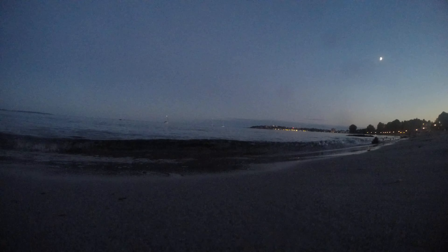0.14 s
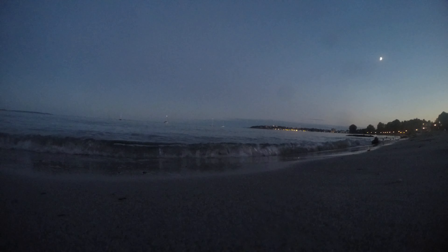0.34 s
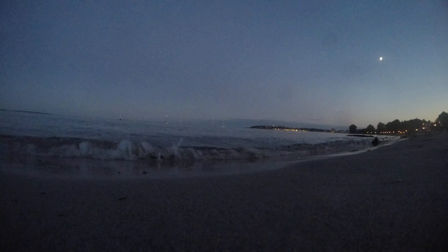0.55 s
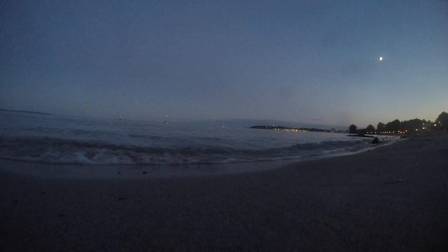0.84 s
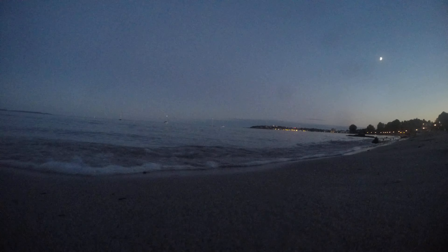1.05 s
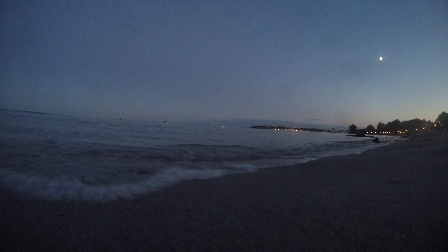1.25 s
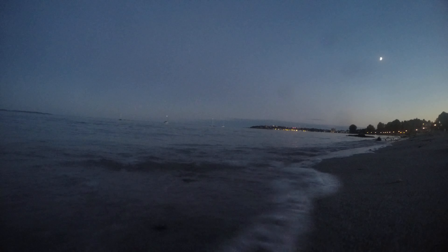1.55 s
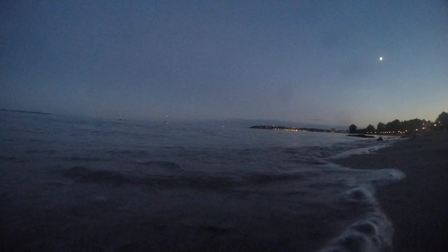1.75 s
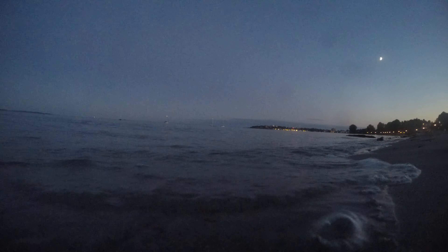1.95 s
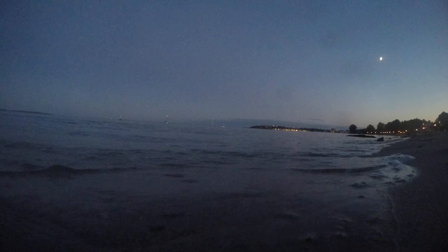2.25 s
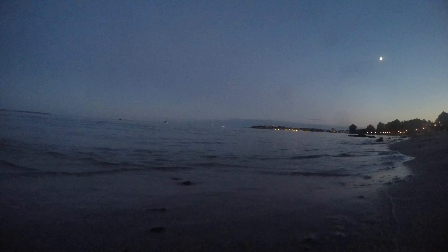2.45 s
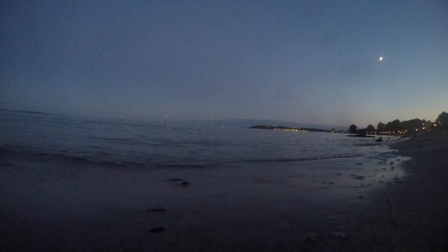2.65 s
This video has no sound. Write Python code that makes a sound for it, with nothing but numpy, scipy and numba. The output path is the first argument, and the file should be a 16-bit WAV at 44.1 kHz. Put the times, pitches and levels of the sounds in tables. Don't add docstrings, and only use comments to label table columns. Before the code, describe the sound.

A small wave breaks on a sandy beach, fizzes up as foam, then drains with bubbling pops

```python
import sys
import numpy as np
from scipy import signal
from scipy.io import wavfile
from scipy.ndimage import uniform_filter1d
from numba import njit

SR = 44100
rng = np.random.default_rng(int(sys.argv[2]) if len(sys.argv) > 2 else 0)


def waveform_to_disk(signal):
    frames = np.transpose(np.atleast_2d(signal))
    scaled = np.clip(frames, -1, 1) * 32767
    samples = np.round(scaled).astype(np.int16)
    wavfile.write(sys.argv[1], SR, samples)


def undo_db(level):
    steps = np.asarray(level, float) / 20
    return 10 ** steps


N = 123921


def set_rms(x, db):
    return x * undo_db(db) / np.sqrt(np.mean(x ** 2))


def spectrum_db(table, hz):
    table = np.array(table)
    return np.interp(np.log(hz), np.log(table[:, 0]), table[:, 1])


def drift(rate_hz):
    k = int(SR / rate_hz)
    steps = np.repeat(rng.standard_normal(N // k + 1), k)
    return 0.8 * uniform_filter1d(uniform_filter1d(steps, k), k)[:N]


def resonance(x, hz, width_hz):
    return signal.lfilter(*signal.iirpeak(hz, hz / width_hz, fs=SR), x)


@njit
def ring(n, start, hz, cycles, size, rise, onset, sr):
    out = np.zeros(n)
    for k in range(len(start)):
        length = cycles[k] * sr / hz[k]
        turn = np.exp(-5. / length + 6.2832j * hz[k] / sr)
        glide = np.exp(6.2832j * hz[k] * rise / length / sr)
        closing = np.exp(-1 / (onset * length))
        z, gap = size[k] + 0j, 1.
        for i in range(min(int(length), n - start[k])):
            out[start[k] + i] += z.imag * (1 - gap)
            z *= turn
            turn *= glide
            gap *= closing
    return out


def bubbles(per_s, table, cycles, scatter_db, rise, onset):
    when, pitch, size, damping = rng.random((int(per_s * N / SR), 4)).T
    lowest, highest = table[0][0], table[-1][0]
    hz = lowest * (highest / lowest) ** pitch
    db = spectrum_db(table, hz) + 20 * np.log10(hz / 1e3)
    db = db + scatter_db * np.minimum(-np.log(1 - size), 5)
    start = (when * N).astype(np.int64)
    return set_rms(ring(N, start, hz, cycles * (.5 + damping), undo_db(db), rise, onset, float(SR)), 0)


# start_s [s], level_db [dB], large_bubbles_db [dB], finest_spray_db [dB]
FOAM_ACTIVITY = [(0, -65, -6, -7), (.08, -62, -12, -3), (.22, -54, -10, 0), (.34, -48.5, -9, 2),
                 (.353, -44.5, -7, 2), (.45, -46, -1.5, 0), (.56, -43.5, -2, 0.3), (.7, -44.5, -1.5, -3),
                 (.76, -49.5, -5.5, -3), (1., -54, -7, -2), (1.4, -58.5, -7, 2), (1.5, -54, -9, 2.5),
                 (1.7, -56.5, -9, 4), (1.95, -54.5, -3.5, 1.5), (2.12, -60, -5.5, -3.5),
                 (2.4, -63, -3.5, 1), (2.7, -66, -18, -2), (2.81, -67, 8, 0.5)]


def foam_activity(t):
    rows = np.array(FOAM_ACTIVITY).T
    return [np.interp(t, rows[0], row) for row in rows[1:]]


# pitch_hz [Hz], level_db [dB]
SURF_SPECTRUM = [(22, -4), (40, 2), (70, -1), (105, -2.5), (130, -18), (250, -17.5), (400, -30.5),
                 (900, -34)]


def surf(t):
    out = 0
    for hz in 22 * 2 ** np.arange(0, 5.5, .4):
        width_hz = hz / 1.77
        noise = resonance(resonance(rng.standard_normal(N), hz, width_hz), hz, width_hz)
        out = out + undo_db(spectrum_db(SURF_SPECTRUM, hz) + 1.54 * drift(9.03)) * noise
    swell_db = 0.073 * foam_activity(t)[0]
    return set_rms(out * undo_db(swell_db), -49.5)


START_DELAY_S = .0008

# start_s [s], level_db [dB, peak], pitch_hz [Hz]
DROPLET_SNAPS = [(.033, -53, 6500), (.196, -56, 6200), (.2394, -47, 6100), (.268, -52, 12500),
                 (.2917, -45, 11500), (.3107, -50, 12000), (.3187, -46, 10800), (.329, -52, 10500),
                 (.3501, -35, 7000), (.4763, -46, 10500), (.595, -52, 12000), (.604, -50, 12000),
                 (.6524, -48, 9500), (0.7275, -44, 11500), (.8819, -49, 7500), (.9173, -50, 7500),
                 (1.4965, -40.5, 4700), (1.6811, -49, 8800), (1.6967, -47, 2200), (1.7261, -40, 4800),
                 (1.7365, -47, 4600), (1.7579, -44, 11000), (1.7635, -42, 4200), (1.7943, -42, 6300),
                 (1.8085, -44, 4200), (1.829, -44.5, 10700), (1.8537, -45, 6000), (1.8685, -47, 7800),
                 (1.878, -45, 4200), (1.9, -47, 10500), (1.917, -45, 4900), (1.9205, -44, 8100),
                 (1.927, -47, 7600), (1.961, -44, 4200), (2.006, -51, 11000), (2.0617, -51, 12500),
                 (2.103, -46, 4300), (2.178, -55, 13000), (2.2747, -49, 12000), (2.4815, -52.5, 2240),
                 (2.575, -52, 8300), (2.6127, -50, 2900), (2.6491, -53.5, 1870), (2.7097, -56, 8300),
                 (2.7297, -54, 2020), (2.767, -53, 8500), (2.7721, -54, 5000), (2.565, -57, 12500)]


def droplet_snaps():
    at, db, hz = np.array(DROPLET_SNAPS).T
    start = ((at + START_DELAY_S) * SR).astype(np.int64)
    cycles = 4.0 + 1.04 * hz / 1e3
    size = undo_db(db + 2.5 + 3 * (hz < 6600))
    return ring(N, start, hz, cycles, size, 0.08, 0.034, float(SR))


# middle_s [s], length_s [s], level_db [dB, peak rms], pitch_hz [Hz]
SPLASHES = [(.292, .005, -51, 3500), (0.387, .07, -52.5, 5550), (.623, 0.0035, -51, 10000),
            (.5, 0.11, -59, 5600), (.677, .04, -62, 780), (1.357, 0.0046, -48, 2600),
            (1.509, .004, -51, 4600), (1.528, 0.015, -44, 4500), (1.535, 0.0047, -45.5, 5870),
            (1.536, 0.0092, -49, 2430), (1.542, 0.0043, -44, 5600), (1.541, 0.033, -57.5, 8200),
            (1.562, .006, -41, 4500), (1.561, .007, -56, 9500), (1.562, .006, -53, 2300),
            (1.572, .002, -44.5, 5900), (1.621, 0.0056, -50.5, 1890), (1.685, 0.0045, -47.5, 2720),
            (1.763, .004, -52.5, 6400), (1.827, 0.0096, -49, 3800), (1.897, .008, -53.5, 2200),
            (1.941, 0.011, -52, 1000), (1.948, .007, -48.5, 3600), (1.992, .003, -52.5, 8000),
            (2.138, .006, -51.5, 4280), (2.135, .004, -61, 12800), (2.307, .004, -53.5, 4200),
            (2.349, .003, -55, 4200), (2.38, .005, -54.5, 3700), (2.397, 0.0037, -55, 1900),
            (2.506, 0.0037, -56.5, 4500), (2.338, .003, -57, 3800), (2.177, .003, -57, 4400)]


def splashes(t):
    crackle = bubbles(9000, [(1200, -2.0), (14000, -23.0)],
                      cycles=3.7, scatter_db=3.0, rise=0.12, onset=0.022)
    out = np.zeros(N)
    for at, length, db, hz in SPLASHES:
        span = slice(int((at - .1) * SR), int((at + .1) * SR))
        swell = np.exp(-(2 * (t[span] - at) / length) ** 2)
        burst = swell * resonance(resonance(crackle[span], hz, 0.5 * hz), hz, 0.92 * hz)
        out[span] += undo_db(db) * burst * np.sqrt(np.sum(swell ** 2) / np.sum(burst ** 2))
    return out


# start_s [s], level_db [dB, peak], pitch_hz [Hz], ring_cycles [cycles], click_db [dB]
POPS = [(0.2923, -36.5, 2710, 30, -6), (0.3535, -35, 2510, 34, -6), (0.6676, -29, 2580, 21, -11),
        (1.3548, -37, 1240, 8.8, 1), (1.41, -42, 2330, 16, 10.5), (1.4275, -38.5, 4550, 17, -9),
        (1.5335, -32.5, 5850, 33, -9), (1.5598, -27, 4160, 17, -14), (1.6577, -38, 2260, 12, -3),
        (1.6826, -39.5, 2070, 11, -6), (1.8248, -42, 2270, 20, -12), (1.9131, -41, 1830, 16, -9),
        (1.7152, -37.5, 4600, 16, -6), (1.7484, -35, 4370, 8.5, 0), (2.0105, -32, 3620, 9.9, -7),
        (2.0788, -41, 2320, 22, 0), (2.135, -39, 2960, 16, -13), (2.1751, -51, 2140, 18, -6),
        (2.226, -45.5, 2720, 14, 2), (2.3057, -52, 2500, 12, -11), (2.3361, -46.5, 2310, 10, -8),
        (2.3482, -44, 2300, 6, 4), (2.372, -46, 3000, 10, 2), (2.3951, -45, 910, 5.7, -2),
        (2.5049, -48.5, 2240, 13, 6)]


def pops():
    at, db, hz, cycles, click_db = np.array(POPS).T
    start = ((at + START_DELAY_S) * SR).astype(np.int64)
    click_hz, click_cycles = np.full(len(at), 4200.), np.full(len(at), 2.4)
    clicks = ring(N, start, click_hz, click_cycles, undo_db(db + click_db), .01, .01, float(SR))
    return clicks + ring(N, start, hz, cycles, undo_db(db + 2.0), 0.037, 0.07, float(SR))


def slap(t):
    slap_s, slap_hz, slap_db = 1.9845, 76.5, -31
    x = np.pi * slap_hz * (t - slap_s)
    push = (1 - 2 * x ** 2) * np.exp(-x ** 2) * np.where(x < -.7, .6, 1)
    rebound = 0.38 * np.exp(-((x - 2.6) / 1.0) ** 2)
    return -undo_db(slap_db) * (push - rebound)


# start_s [s, peak], pitch_hz [Hz], length_s [s], level_db [dB, peak], rise [share]
AIR_POCKETS = [(0.253, 261, 0.048, -48, 0.0059), (0.313, 285, 0.024, -55, 0.038),
               (0.357, 342, 0.02, -38, -0.14), (0.373, 238, 0.026, -41.5, -0.059),
               (.403, 145, 0.023, -42, 0.092), (.423, 160, 0.023, -45.5, .08),
               (.415, 252, 0.029, -45, 0.01), (.445, 178, 0.055, -41, -0.011),
               (.495, 181, 0.039, -43.5, 0.071), (.503, 265, 0.025, -38.5, 0.062),
               (0.533, 292, 0.04, -43, 0.019), (.56, 287, .03, -46, .01), (.57, 150, .03, -47, .05),
               (.62, 140, 0.021, -42, .08), (.74, 111, .03, -44, 0.038), (0.598, 159.4, 0.041, -40, 0.0025),
               (.605, 274.6, 0.039, -37.5, 0.067), (0.633, 248, 0.029, -27, 0.038),
               (0.651, 292, 0.022, -35.5, 0.079), (0.691, 82, 0.054, -39, -0.06),
               (.83, 195, 0.045, -51.5, -0.18), (2.766, 236, 0.029, -54.5, -0.038)]


def air_pockets(t):
    out = 0
    for at, hz, length, db, rise in AIR_POCKETS:
        x = t - at
        steepness = np.where(x < 0, 2.6, 1.9)
        swell = np.exp(-(np.clip(x / length, -9, 9) * steepness) ** 2)
        out = out + undo_db(db) * swell * np.cos(2 * np.pi * hz * (x + rise * x ** 2 / length))
    return out


# pitch_hz [Hz], level_db [dB]
FINE_SPECTRUM = [(900, -3), (1500, -1.5), (2500, 0), (3500, -4.5)]
SPRAY_SPECTRUM = [(3200, 3), (5000, 3.5), (7200, -4), (7800, -12), (10500, -13.5), (14500, -15)]
LARGE_SPECTRUM = [(130, 5), (200, 3), (300, 2), (450, -2), (750, -5.5), (1300, -13)]


def foam(t):
    busy_db, large_db, spray_db = foam_activity(t)
    patch_db = 0.7 * drift(25.3)
    fine = bubbles(3000, FINE_SPECTRUM, cycles=16.9, scatter_db=1.5, rise=0.11, onset=0.061)
    fine = fine * undo_db(patch_db - 4 + 0.23 * drift(41.2))
    spray = bubbles(7000, SPRAY_SPECTRUM, cycles=14.2, scatter_db=2.5, rise=0.23, onset=0.076)
    spray = spray * undo_db(patch_db + spray_db - 6)
    large = bubbles(1500, LARGE_SPECTRUM, cycles=8.35, scatter_db=-0.2, rise=0.22, onset=0.15)
    large = large * undo_db(large_db + 0.76 * drift(13.7))
    ticks = bubbles(140, [(1500, -13), (11000, -13)],
                    cycles=7.7, scatter_db=1.1, rise=0.089, onset=0.024)
    plinks = bubbles(260, [(700, 2), (2300, -7.5), (6500, -22)],
                     cycles=17.3, scatter_db=2.0, rise=0.18, onset=0.054)
    drain_s, drain_width_s = 2.35, 0.87
    drain = np.exp(-((t - drain_s) / drain_width_s) ** 2)
    draining = drain * (ticks * undo_db(-16) + plinks * undo_db(-6.5))
    return undo_db(busy_db) * (fine + spray + large + draining)


def scene():
    t = np.arange(N) / SR
    background = surf(t)
    nearby = droplet_snaps() + splashes(t) + pops() + slap(t)
    wave = air_pockets(t) + foam(t)
    return (background + nearby + wave)[None]


# pitch_hz [Hz], width_hz [Hz], gain_db [dB]
HOUSING = [(780, 226, 3.5), (1001, 106, -8.5), (2140, 670, 2.5), (2910, 290, 3), (3264, 1130, -6),
           (4585, 440, 3), (6000, 200, 1.5), (8000, 4400, -1), (10000, 1200, 5), (13000, 1400, 2)]


def housing(x):
    for hz, width, db in HOUSING:
        x = x + (undo_db(db) - 1) * resonance(x, hz, width)
    return x


def low_pass(x):
    return signal.sosfilt(signal.butter(12, 15680, fs=SR, output="sos"), x)


def record(dry):
    x = housing(dry)
    hiss = signal.lfilter(*signal.butter(1, 8900, fs=SR), rng.standard_normal(x.shape))
    top_cut = signal.ellip(10, .3, 70, 15270, fs=SR, output="sos")
    mix = signal.sosfilt(top_cut, x + set_rms(hiss, -67))
    return low_pass(mix)


dry = scene()
out = record(dry)
waveform_to_disk(out)
```